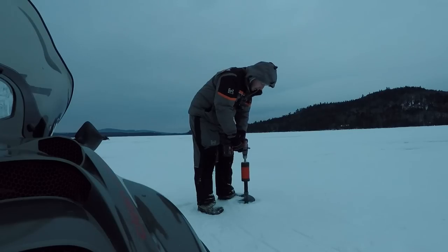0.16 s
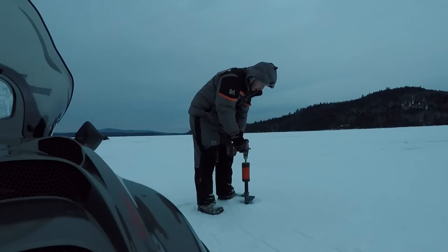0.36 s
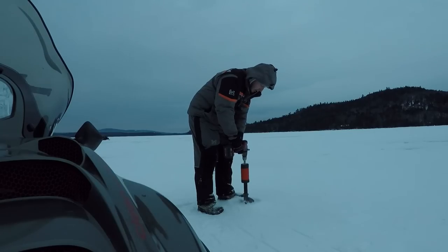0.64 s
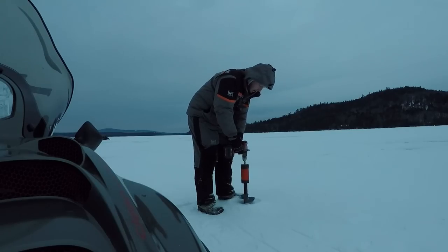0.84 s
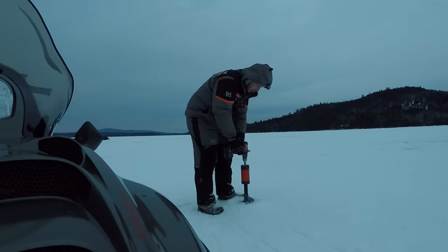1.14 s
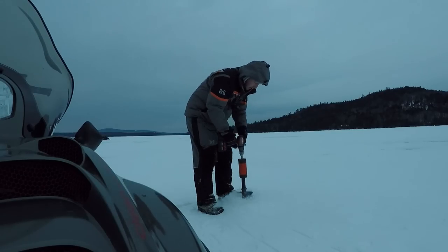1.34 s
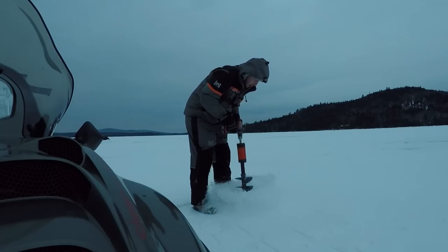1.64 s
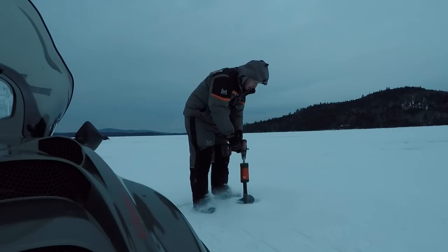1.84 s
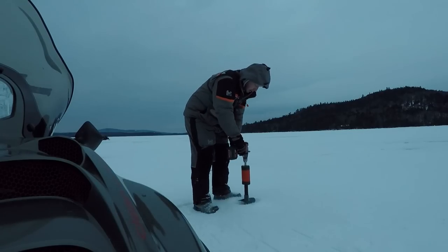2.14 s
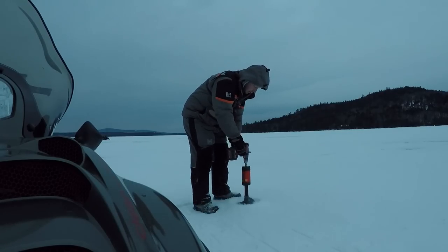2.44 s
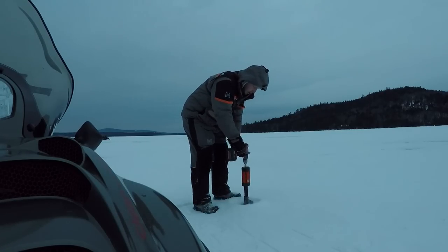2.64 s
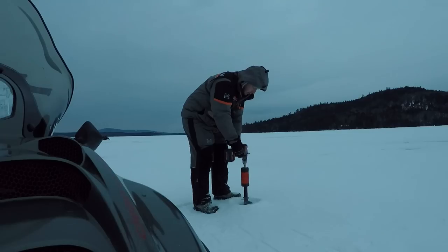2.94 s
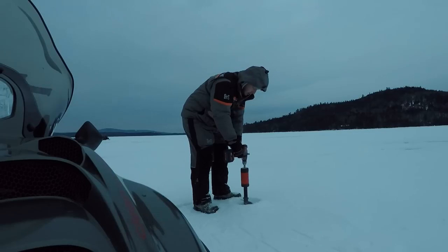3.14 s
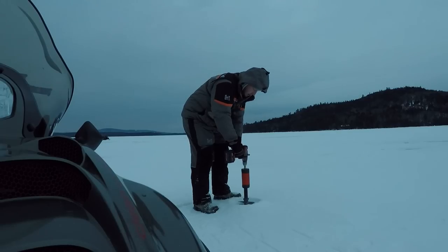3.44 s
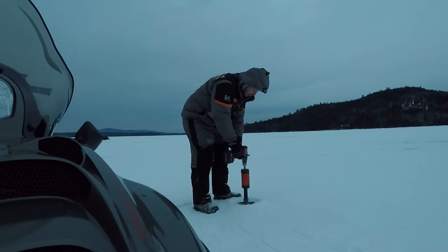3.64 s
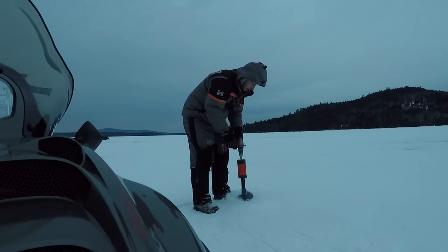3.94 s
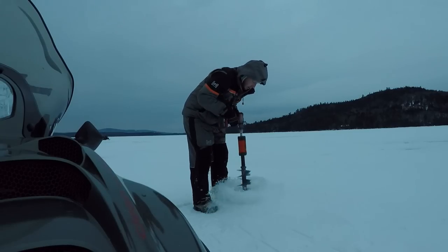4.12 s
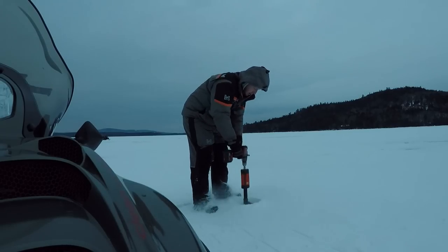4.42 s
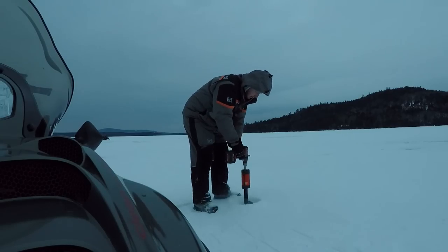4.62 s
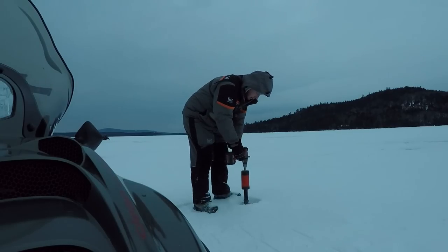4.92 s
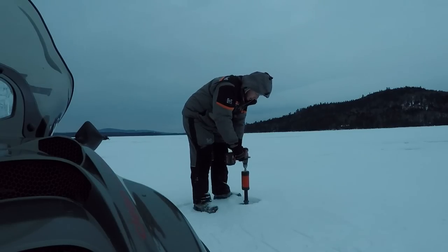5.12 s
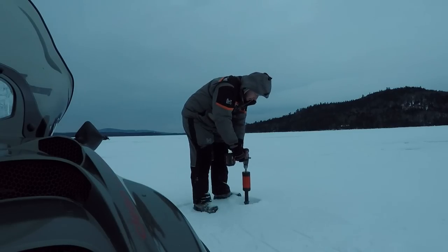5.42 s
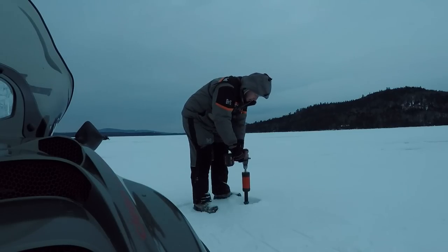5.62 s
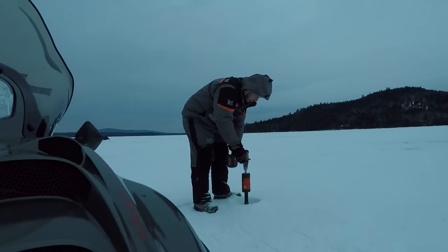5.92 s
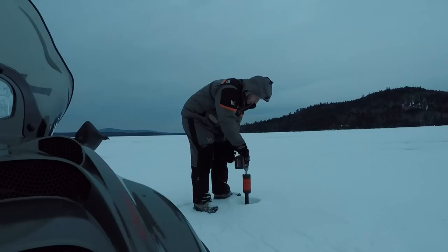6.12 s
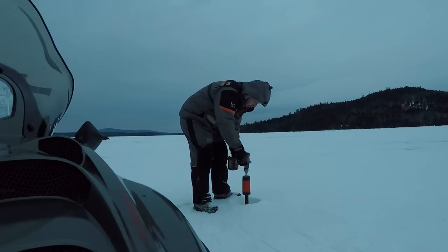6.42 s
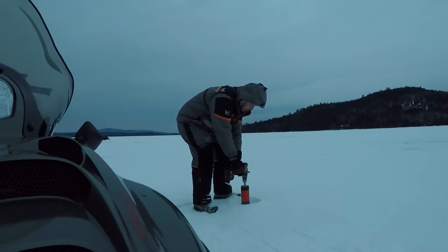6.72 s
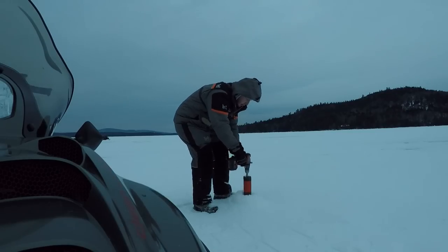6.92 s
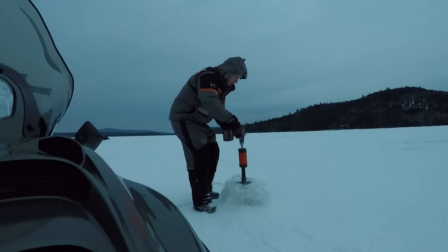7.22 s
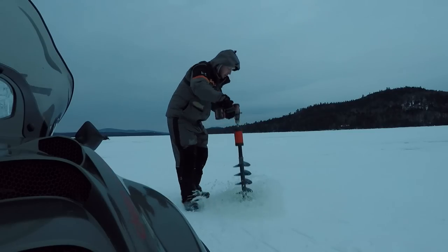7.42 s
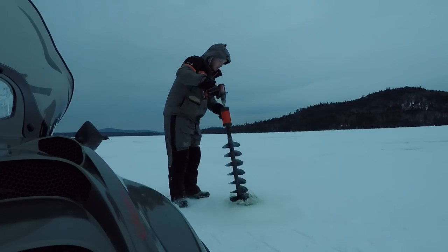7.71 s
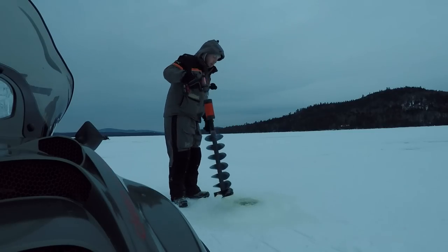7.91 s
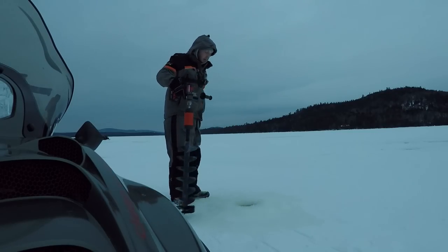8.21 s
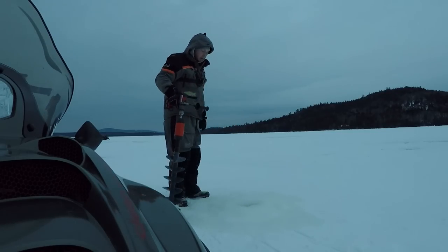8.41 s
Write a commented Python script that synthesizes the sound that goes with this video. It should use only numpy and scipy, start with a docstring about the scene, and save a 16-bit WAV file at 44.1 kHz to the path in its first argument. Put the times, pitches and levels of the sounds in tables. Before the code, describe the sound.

Outdoors on a frozen lake, low wind buffets and rumbles in a stereo microphone throughout. From 0 to 1.2 s a cordless drill whines unsteadily over brush and fan hiss, its steel auger grinding ice with a hollow, throbbing ring and small bright pings. At 1.2-1.9 s it is lifted: the whine leaps up, the auger knocks and scrapes the hole, and shavings patter down. Grinding resumes from 2 to 3.8 s, followed by another rattling, scattering lift until 4.4 s. The third cut runs from 4.5 s; around 6-6.3 s the motor sags, slush churns and the blade breaks through. The whine then rises and runs free until about 7.3 s. Slosh and knocks lead to a short falling gulp near 7.4 s and a fizzing gush peaking at 7.5 s. Drips plink from 7.9 s, a boot scuffs dully, and the auger crunches onto snow at 8.35-8.5 s.

```python
"""Frozen lake, windy day: a cordless drill drives a steel auger through the ice.
Ice chips ring auger, hole and sheet; motor tones follow a speed curve over brush and fan hiss. The auger
is lifted twice to throw out shavings and rattles in the hole; it breaks through, runs free, is pulled out
with a gulp and gush of water (noise, gliding sines) and is set down on the snow (gritty bursts).
Filtered noise makes the wind; a pair of microphone ports hears it all."""
import sys
import numpy as np
from scipy import signal
from scipy.fft import rfft, irfft
from scipy.io import wavfile

SR = 44100
rng = np.random.default_rng(int(sys.argv[2]) if len(sys.argv) > 2 else 0)


def wrap_up_sound(samples):
    """Save the sound to the file named by the first command line argument, as 16-bit audio."""
    columns = np.atleast_2d(samples).T
    # keep every value between -1 and 1, then stretch to whole-number steps
    tamed = np.clip(columns, -1, 1)
    steps = np.round(tamed * 32767).astype(np.int16)
    wavfile.write(sys.argv[1], SR, steps)


N = 377496
T = np.arange(N) / SR


def gain_of(db):
    """Amplitude factor of a level in dB."""
    return 10 ** (np.asarray(db) / 20)


def evened(x):
    """Scales to rms 1."""
    return x / np.sqrt(np.mean(x ** 2) + 1e-20)


def read(points, hz):
    """Interpolates a (frequency, value) curve on a log frequency axis."""
    f, value = np.transpose(points)
    return np.interp(np.log(hz + 1), np.log(f + 1), value)


def over_time(points):
    """Interpolates a (time, value) curve over the whole scene."""
    return np.interp(T, *np.transpose(points))


def level(rows, column=1):
    """Gain over time from one dB column, -120 dB outside the curve."""
    rows = np.array(rows)
    return gain_of(np.interp(T, rows[:, 0], rows[:, column], left=-120, right=-120))


def add(mix, start_s, sound):
    """Adds a sound in place, cut at the end of the mix."""
    part = mix[round(start_s * SR):][:len(sound)]
    part += sound[:len(part)]


def coloured(x, points):
    """Filters by a spectrum that is closed outside its ends; rms 1."""
    hz = np.fft.rfftfreq(len(x), 1 / SR)
    inside = (hz > points[0][0]) & (hz < points[-1][0])
    spectrum = rfft(x) * gain_of(read(points, hz)) * inside
    return evened(irfft(spectrum, len(x)))


def drift(hz):
    """Slow random curve of rms 1, up to about hz."""
    return evened(signal.lfilter(*signal.butter(2, hz, fs=SR), rng.standard_normal(N)))


def chips(per_s, spread_db):
    """Random clicks of random sign; a few are large."""
    big = gain_of(spread_db * np.minimum(rng.exponential(1, N), 5))
    return big * rng.standard_normal(N) * (rng.random(N) < per_s / SR)


def bursts(rows, carrier, rise_s):
    """Opens the carrier at each (time, dB, length): quick rise, bell-shaped fall."""
    gate = np.zeros(N)
    t = np.arange(SR // 8) / SR
    for start_s, db, length_s in rows:
        fall = np.exp(-(t / max(length_s, .003)) ** 2)
        add(gate, start_s, gain_of(db) * (1 - np.exp(-t / rise_s)) * fall)
    return gate * carrier


def resonate(x, hz, width_hz):
    """Shifts hz to zero, smooths, shifts back: a resonance that may move; rms 1."""
    turn = np.exp(2j * np.pi * np.cumsum(hz * np.ones(len(x))) / SR)
    r = np.exp(-np.pi * width_hz / SR)
    smooth = signal.lfilter([1 - r], [1, -r], x / turn)
    return evened((turn * smooth).real)


# uneven level of the wind noise: (time [s], low buffeting level [dB], rumble level [dB])
WIND_LEVEL = [(0.0, -16, -16.5), (1.02, -21, -18.5), (1.29, -11.5, -15.5), (1.52, -27, -23.5),
              (2.19, -17.5, -16.5), (2.5, -29, -19), (2.91, -17, -18), (5.91, -18.5, -18.5),
              (6.17, -22, -11), (6.25, -29, -21.5), (6.51, -15.5, -21), (7.91, -14.5, -17.5),
              (8.49, -15.5, -15.5), (8.56, -10, -21)]
# wind spectra: (frequency [Hz], relative density [dB per Hz])
BUFFET_COLOUR = [(5, -34), (14, -10), (28, -9.5), (45, -5.5), (70, -14.5)]
RUMBLE_COLOUR = [(45, -27.5), (65, -1), (100, -0.5), (150, -7), (220, -18.5), (340, -27), (560, -50),
                 (1000, -79)]


def wind():
    """Low buffeting and an uneven rumble, both filtered noise of uneven level."""
    buffet = level(WIND_LEVEL) * coloured(rng.standard_normal(N), BUFFET_COLOUR)
    unevenness = gain_of(2.83 * drift(15.6))
    rumble = coloured(rng.standard_normal(N) * unevenness, RUMBLE_COLOUR)
    return buffet + level(WIND_LEVEL, column=2) * rumble


# auger set on snow: (time [s], relative level [dB], length [s])
CRUNCHES = [(8.329, -47, 0.009), (8.369, -12.5, 0.011), (8.387, -24, 0.023), (8.418, -34, 0.018),
            (8.449, -26.5, 0.013), (8.468, -38, 0.009)]
# a boot shifts on the ice: (time [s], level [dB], length [s])
SHUFFLES = [(7.92, -25, 0.035), (8.17, -18, 0.045), (8.22, -20, 0.044)]
# crust and boot spectra: (frequency [Hz], relative density [dB per Hz])
CRUNCH_COLOUR = [(240, -31), (400, -3), (1100, -14.5), (1330, -10.5), (2930, -22), (5890, -21.5),
                 (13900, -46)]
SHUFFLE_COLOUR = [(150, 9), (250, 9), (450, -9), (800, -27), (1200, -40)]


def snow():
    """Crust gives way in a few gritty steps; a boot scuffs dully."""
    crust = gain_of(-5.5) * bursts(CRUNCHES, coloured(chips(5700, 2.7), CRUNCH_COLOUR), 0.0011)
    boot = bursts(SHUFFLES, coloured(chips(3000, 1.1), SHUFFLE_COLOUR), 0.01)
    return crust + boot


# the hole gulps as the auger leaves it: (time [s], peak [dB], first [Hz], last [Hz], length [s])
GULP = (7.375, -22, 980, 520, .032)


def gulp():
    """One large pocket of air, falling in pitch as it opens."""
    start_s, db, first_hz, last_hz, length_s = GULP
    out, u = np.zeros(N), np.linspace(0, 1, round(length_s * SR))
    cycles = length_s * (first_hz * u + (last_hz - first_hz) * u ** 2 / 2)
    add(out, start_s, gain_of(db) * np.sin(np.pi * u) * np.sin(2 * np.pi * cycles))
    return out


# water and slush running off the auger: (time [s], level [dB])
GUSH = [(7.2, -77), (7.36, -31), (7.5, -26), (7.64, -28.5), (7.75, -35.5), (7.95, -41), (8.15, -41.5),
        (8.25, -48.5), (8.56, -55)]
# its spectrum: (frequency [Hz], relative density [dB per Hz])
GUSH_COLOUR = [(250, -5), (450, -1), (800, -11.5), (1500, -9), (3500, -11.5), (4600, -17), (6200, -11.5),
               (10000, -27.5), (13500, -44)]
# water churning low in the hole: (time [s], level [dB])
SLOSH = [(5.9, -30), (6.1, -24.5), (6.35, -35.5), (6.95, -44), (7.1, -32), (7.35, -28.5), (7.6, -46),
         (7.75, -53)]
# single drops: (time [s], peak [dB], starting bubble tone [Hz])
DRIPS = [(7.8594, -44, 2540), (7.9169, -43, 1120), (7.9494, -38, 1720), (8.0381, -30, 1550),
         (8.1115, -27, 1600), (8.15, -37, 3170), (8.1694, -34, 2150), (8.272, -35, 820)]
SLOSH_HZ, SLOSH_WIDTH_HZ = 364, 320
BUBBLE_CYCLES = 41  # 60 dB decay in cycles of the starting tone: large bubbles last longer


def water():
    """Low slosh, fizzing spray, fine bright spatter, and single drops whose bubbles rise in pitch."""
    t = np.arange(SR // 10) / SR
    spray = gain_of(drift(45)) * coloured(chips(4900, 0.63), GUSH_COLOUR)
    spatter = resonate(chips(90, 1.6), 6300, 2500)
    churn = resonate(chips(1500, 2.4), SLOSH_HZ, SLOSH_WIDTH_HZ)
    out = level(GUSH) * (spray + 0.098 * spatter)
    out += level(SLOSH) * resonate(churn, SLOSH_HZ, SLOSH_WIDTH_HZ)
    for start_s, db, hz in DRIPS:
        decay = gain_of(db - 60 * t * hz / BUBBLE_CYCLES)
        add(out, start_s, decay * np.sin(2 * np.pi * hz * (t + 16.0 * t ** 2)))
    return out


# shavings rain down round the hole: (start [s], end [s], relative level [dB])
THROWS = [(1.32, 1.82, -18), (4.0, 4.37, -19)]
SHARDS_PER_S, SHARD_LOW_HZ, SHARD_HIGH_HZ, SHARD_PEAK_S = 170, 1600, 5500, .0015


def shavings():
    """Thrown shards land at random, each a short gritty ring; the low ones are louder."""
    out, t = np.zeros(N), np.arange(SR // 40) / SR
    shape = 0.5 * t / SHARD_PEAK_S * np.exp(1 - t / SHARD_PEAK_S)
    for on, off, db in THROWS:
        for when, pitch, size in rng.random((round(SHARDS_PER_S * (off - on)), 3)):
            hz = SHARD_LOW_HZ * (SHARD_HIGH_HZ / SHARD_LOW_HZ) ** (pitch ** 1.4)
            ring = resonate(rng.standard_normal(len(t)), hz, 300) * shape
            add(out, on + when * (off - on), gain_of(db - 9 * pitch - 14 * size) * ring)
    return out


# auger bears on the ice, cutting hard or only rubbing: (start [s], end [s], level [dB])
CONTACT = [(-.1, 1.187, -16), (1.2, 2.04, -26), (2.003, 3.764, -16.5), (3.785, 4.5, -31),
           (4.532, 6.308, -17), (6.328, 6.445, -28.5), (6.445, 7.05, -49), (7.026, 7.59, -34.5)]
BITE_IN_S, LIFT_OFF_S = 0.013, 0.034


def contact():
    """Gain of the grinding: quick to bite, a little slower to let go."""
    total = np.zeros(N)
    for on, off, db in CONTACT:
        ramps = np.minimum((T - on) / BITE_IN_S, 1 + (off - T) / LIFT_OFF_S)
        total += gain_of(db) * np.clip(ramps, 0, 1)
    return total


# hard chips strike the flighting: (time [s], relative level [dB])
PINGS = [(0.0548, -34), (0.182, -23), (0.3676, -28), (0.4354, -31), (0.7682, -22), (0.7976, -29),
         (0.8914, -30), (1.041, -29), (2.0991, -28), (2.2089, -26), (2.7412, -25), (2.8809, -30),
         (4.8564, -26), (4.9177, -27), (5.1397, -31), (5.5982, -30), (5.96, -44), (6.03, -31),
         (6.0596, -30), (6.1, -37), (6.1355, -29), (6.18, -31), (6.215, -34)]
# ringing modes of the steel: (frequency [Hz], relative level [dB], t60 [s])
STEEL = [(6200, -2, 0.034), (5900, 3, 0.079), (8150, -8, .04), (9015, 2.5, 0.05), (10000, -10, .02),
         (11100, -14, .015), (12200, -5, .015), (13030, -14, .03)]


def steel():
    """Flighting modes rung by strong timed strikes and a faint steady patter during contact."""
    t = np.arange(SR // 8) / SR
    modes = sum(gain_of(db - 60 * t / t60) * np.sin(2 * np.pi * hz * t) for hz, db, t60 in STEEL)
    strikes = bursts([(s, db - 20, .017) for s, db in PINGS], chips(1500, 1.0), 0.0018)
    patter = gain_of(-48) * contact() * chips(400, 3.8)
    return signal.oaconvolve(strikes + patter, modes)[:N]


# the hole rings lower as it deepens: (time [s], resonance [Hz])
HOLE = [(0, 1460), (1.2, 1350), (2, 1360), (6.3, 1137), (7, 1100)]
# auger knocks and scrapes on the hole wall: (time [s], nominal peak [dB], relative treble share [dB])
KNOCKS = [(1.2504, -11.5, -26), (1.2725, -22, -22), (1.33, -6.5, -20), (1.3703, -8, -7),
          (1.3924, -11.5, -9), (1.4214, -12, -9), (1.4374, -16, -11), (1.4824, -9, -9), (1.5074, -23, 2),
          (1.5514, -10, -5.5), (1.5838, -12, -7), (1.6245, -14, -3), (1.652, -9.5, -14), (1.698, -1.5, -18),
          (1.7404, -10, -17), (1.7864, -7, -13), (1.8655, -12, -26), (3.8312, -15, -20.5),
          (3.8691, -10, -11), (3.8915, -7.5, -28), (3.929, -8, -26), (3.988, -4, -13.5), (4.0494, -7, -7.5),
          (4.0904, -25, -1.5), (4.1254, -11.5, -5), (4.1615, -13.5, -2.5), (4.218, -13.5, -2),
          (4.2424, -11.5, -10), (4.2724, -5, -15), (4.3226, -3.5, -14), (4.343, -13, -27),
          (4.4154, -11, -18), (6.027, -9, -13), (6.1296, -26, -20), (6.169, -10, -21), (6.405, -10.5, -21),
          (6.4734, -19, -23), (7.052, -20, -21), (7.1524, -12, -15), (7.255, -8.5, -18),
          (7.4124, -11.5, -21)]
# cracking ice spectrum: (frequency [Hz], relative density [dB per Hz])
KNOCK_TREBLE = [(1500, -47), (2000, 5.5), (2700, 3), (3700, -4.5), (4400, -2), (6200, 0.5), (8800, -4.5),
                (10500, -24), (13800, -58)]
KNOCK_MEAN_S, KNOCK_SPREAD = 0.026, 0.52  # scrape length and its random share
RING_RISE, RING_DROP_PER_DB, HARD_DB = 1.1, .011, -15  # hole pitch factor, less for harder knocks
CREST_DB, CRUNCH_DB = 7.5, -2  # nominal peak over rms; crunch offset on its share


def knocks():
    """Each scrape rings the hole, lower when hard; flung lumps of ice crack higher up."""
    out, grit, t = np.zeros(N), chips(6000, 3.2), np.arange(SR // 8) / SR
    spray = coloured(grit, KNOCK_TREBLE)
    chance = rng.uniform(-1, 1, (len(KNOCKS), 2))
    for (start_s, db, share_db), (lump, linger) in zip(KNOCKS, chance):
        first = round(start_s * SR)
        at = slice(first, first + len(t))
        hz = np.interp(start_s, *np.transpose(HOLE)) * (RING_RISE - RING_DROP_PER_DB * (db - HARD_DB))
        ring = resonate(resonate(grit[at], hz, 420), hz, 420)
        crunch = spray[at] + 1.03 * resonate(spray[at], 2600 + 900 * lump, 300)
        length_s = KNOCK_MEAN_S * (1 + KNOCK_SPREAD * linger)
        shape = (1 - np.exp(-t / 0.0016)) * np.exp(-(t / length_s) ** 4)
        strike = ring + gain_of(share_db + CRUNCH_DB) * crunch
        add(out, start_s, gain_of(db - CREST_DB) * shape * strike)
    return out


# brushes, fan and flying shavings: (time [s], level [dB])
HISS = [(0, -27), (1.9, -27), (3.75, -29), (6, -29), (6.5, -36), (7.25, -29), (7.4, -35.5), (7.6, -38)]
# hiss and ice sheet spectra: (frequency [Hz], relative density [dB per Hz])
HISS_COLOUR = [(500, -50), (800, -3), (1340, 2), (2130, -6.5), (2700, -3), (3050, -5), (3800, -3),
               (4400, -10.5), (5400, -4.5), (6600, -1.5), (7600, -9.5), (9500, -21.5), (11500, -30),
               (13200, -32), (13700, -50)]
SHEET_COLOUR = [(140, -18), (200, 3), (350, 6.5), (550, -0.5), (800, -5)]


def hiss():
    """Dense unsteady clicks of brushes, fan and shavings; the turning auger shakes the ice sheet."""
    rush = gain_of(1.14 * drift(18)) * coloured(chips(9000, 0.67), HISS_COLOUR)
    shake = gain_of(-7) * coloured(rng.standard_normal(N), SHEET_COLOUR)
    return level(HISS) * (rush + shake)


# motor speed, one table per stretch in which the whine stands out: (time [s], slot tone [Hz])
SPEEDS = [
    [(0, 2680), (.2, 2790), (.27, 2460), (.37, 2440), (.48, 2260), (.57, 2560), (.8, 2520), (.85, 2350),
     (1.01, 2295), (1.06, 2570), (1.16, 2660), (1.28, 3660), (1.32, 3800), (1.38, 3700)],
    [(1.9, 3660), (1.95, 3490), (1.98, 3620), (2.05, 3150), (2.12, 2690), (2.4, 2710), (2.58, 2580),
     (2.65, 2760), (3.23, 2810), (3.43, 2680), (3.5, 2780), (3.69, 2760), (3.77, 2990), (3.85, 3810),
     (4.04, 3740)],
    [(4.47, 3750), (4.54, 3510), (4.62, 2920), (4.75, 2590), (4.85, 2740), (5.03, 2570), (5.11, 2800),
     (5.18, 2500), (5.31, 2890), (5.46, 2840), (5.6, 3070), (5.7, 3030), (5.76, 2690), (5.86, 2770),
     (5.97, 2330), (6.03, 2030), (6.07, 2280), (6.11, 2250), (6.15, 1930), (6.27, 2830), (6.32, 2950),
     (6.4, 3550), (6.44, 3510), (6.49, 3920), (6.66, 4040), (6.72, 3870), (6.83, 3770), (7, 3935),
     (7.26, 3905), (7.32, 3600)],
]
# strength at each speed: (slot tone [Hz], its relative level [dB], octave relative level [dB])
WHINE = [(1900, -55, -52), (2100, -55, -45), (2750, -54, -40), (3100, -47, -39), (3550, -37, -42),
         (3800, -37, -46), (4040, -38, -50)]
# slot tone and octave swell and sink as the drill is moved: (time [s], extra level [dB])
WHINE_LEVEL = [(1.12, -1), (1.22, 3), (1.3, -6), (1.9, 3), (2.1, -1), (3.8, 0), (3.9, -5), (4.5, -1),
               (6.03, 0), (6.1, -8), (6.25, -2), (6.44, 0), (6.5, -8), (6.67, -10), (6.71, 2), (7.1, 1),
               (7.17, -5)]
# gear tones: (multiple of slot tone [1], level against its WHINE strength [dB])
GEARS = [(.75, -11), (1.22, -18), (1.4, -19), (2.31, -20)]
# gear tones at load 1: (multiple of slot tone [1], level against octave WHINE strength [dB])
MESH = [(.353, 3), (1.4, -8)]
WHINE_FADE_S = .03
LOADED_HZ, UNLOAD_HZ, MOST_LOAD = 3300, 600, 2.2  # load grows from 0 as the slot tone sags


def whine():
    """Slot tone, its octave and gear tones, unsteady; some gear tones grow as load slows the motor."""
    speed = over_time(np.concatenate(SPEEDS))
    load = np.clip((LOADED_HZ - speed) / UNLOAD_HZ, 0, MOST_LOAD)
    wobble = 1 + (.004 + .004 * load) * drift(70)
    flutter = gain_of((1.5 + 2 * load) * drift(12) + 2.5 * drift(70))
    heard = np.zeros(N)
    for rows in SPEEDS:
        inside_s = np.minimum(T - rows[0][0], rows[-1][0] - T)
        heard += np.clip(inside_s / WHINE_FADE_S + .5, 0, 1)
    turn = 2 * np.pi * np.cumsum(speed * wobble) / SR
    facing = gain_of(over_time(WHINE_LEVEL))
    slot = facing * np.sin(turn) + sum(gain_of(db) * np.sin(k * turn) for k, db in GEARS)
    mesh = sum(gain_of(db) * np.sin(k * turn) for k, db in MESH)
    octave = facing * np.sin(2 * turn) + load * mesh
    hz, slot_db, octave_db = np.transpose(WHINE)
    slot_gain = gain_of(np.interp(speed, hz, slot_db))
    octave_gain = gain_of(np.interp(speed, hz, octave_db))
    return 2 * flutter * heard * (slot_gain * slot + octave_gain * octave)


# auger and ice ringing: (frequency [Hz], relative density [dB per Hz])
GRIND_COLOUR = [(500, -54), (700, -20), (900, -14.5), (1070, -4.5), (1300, -2.5), (1600, -11.5),
                (2100, -21.5), (2600, -32), (3200, -46)]


def blades():
    """Ice chips break off densely, throbbing with each bite, and ring auger, hole and ice sheet."""
    bite = gain_of(1.7 * np.sin(2 * np.pi * 6.1 * T + 3.9 * drift(0.68)) + 0.53 * drift(22))
    surge = gain_of(1.5 * drift(7))
    breaking = chips(5000, 0.53) * bite * surge
    auger = coloured(breaking, GRIND_COLOUR)
    hole = resonate(auger, over_time(HOLE), 230)
    sheet = gain_of(-14) * coloured(breaking, SHEET_COLOUR)
    return contact() * (evened(2.9 * auger + hole) + sheet)


# microphone ports, left-right likeness: (frequency [Hz], share of power in common [0..1])
SAME = [(60, .98), (250, .96), (600, .94), (1300, .98), (2800, .96), (5000, .88), (8000, .64), (13500, .62)]
# balance: (frequency [Hz], left minus right [dB])
LEAN = [(60, 2), (130, 1), (300, 3), (600, 12), (1200, -0.5), (2500, -1.5), (6000, 0.5), (8500, -8.5),
        (10500, -5.5), (13000, 1)]
# phase: (frequency [Hz], left lead [rad])
LEAD = [(0, -0.43), (520, 0.34), (780, 0.7), (2580, 0.44), (4570, -0.32), (7060, -0.8), (7840, -1.5),
        (8530, -1.9), (10500, 0.15), (13700, -0.2)]


def scene():
    """Two ports hear one field with own balance and phase; a part scatters differently to each."""
    sound = wind() + snow() + gulp() + water() + shavings() + steel() + knocks()
    sound += hiss() + whine() + blades()
    hz, _, z = signal.stft(sound, SR, nperseg=512, noverlap=384)
    alike = np.sqrt(np.clip(read(SAME, hz), 0, 1))[:, None]
    tilt = (gain_of(read(LEAN, hz) / 2) * np.exp(.5j * read(LEAD, hz)))[:, None]
    phase = 2 * np.pi * rng.random((z.shape[1], len(hz), 2)).T
    scattered = 2 * abs(z) * np.exp(1j * phase)  # doubled: random phases partly cancel in the overlap
    ports = (alike * z + np.sqrt(1 - alike ** 2) * scattered) * np.array([tilt, 1 / tilt])
    return signal.istft(ports, SR, nperseg=512, noverlap=384)[1][:, :N]


EDGE_HZ = 14100


def record(dry):
    """Peaks are rounded off softly; then a low-pass sets the band limit."""
    soft = np.tanh(dry)
    low_pass = signal.firwin(511, EDGE_HZ, window=("kaiser", 9), fs=SR)
    return signal.oaconvolve(soft, low_pass[None], "same")


dry = scene()
out = record(dry)
wrap_up_sound(out)
```